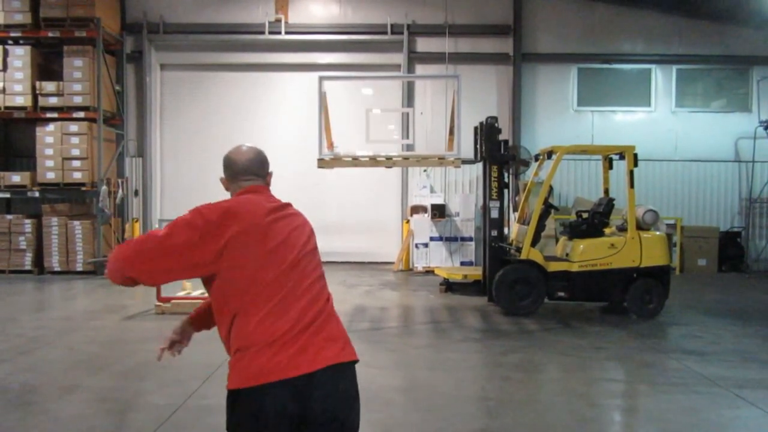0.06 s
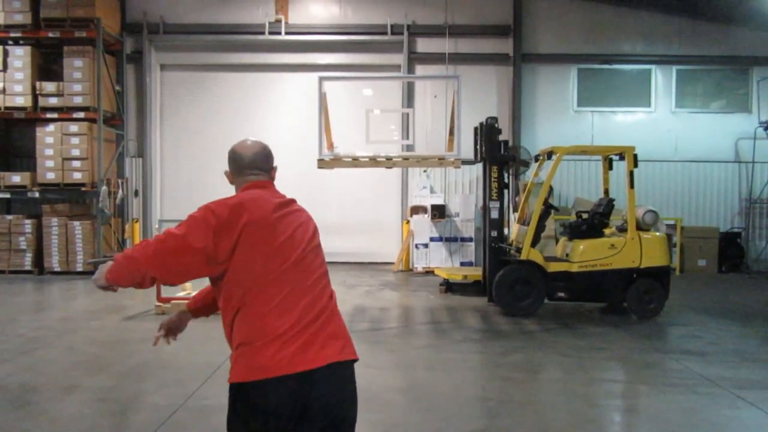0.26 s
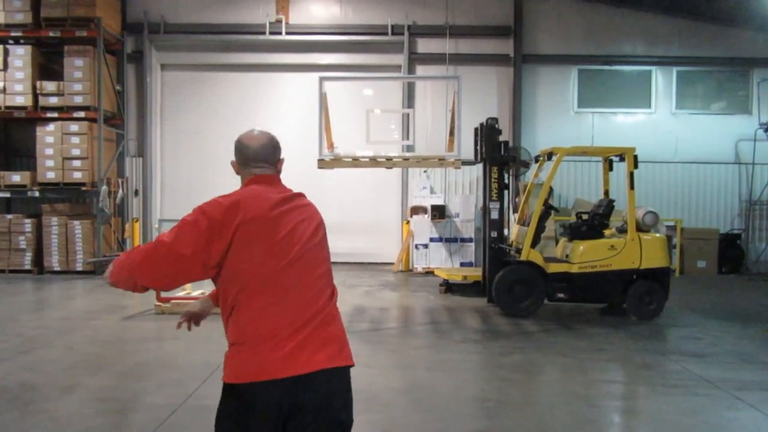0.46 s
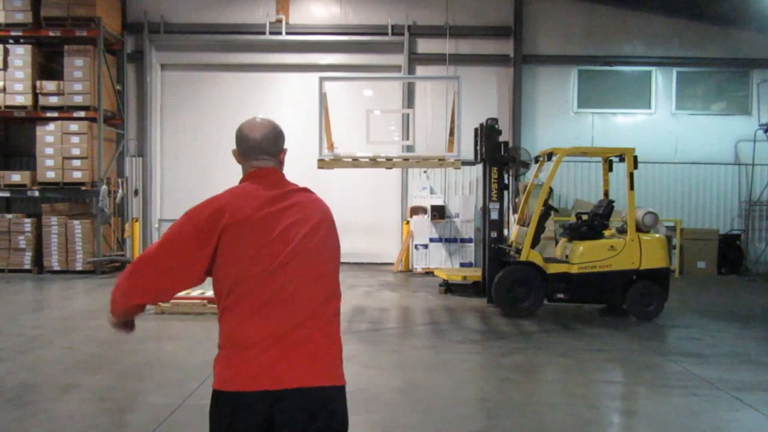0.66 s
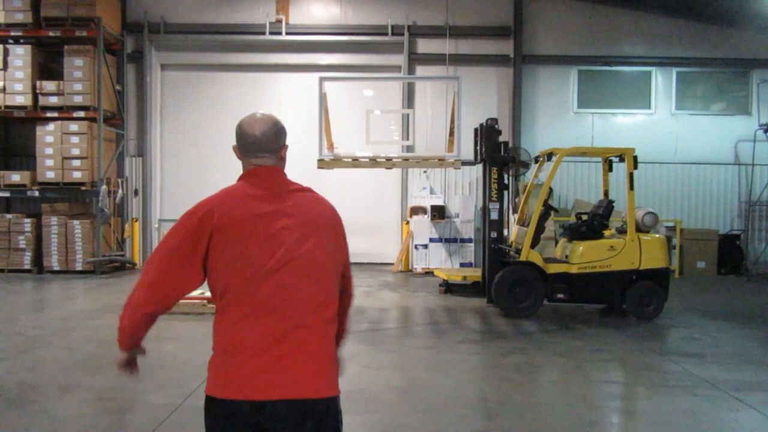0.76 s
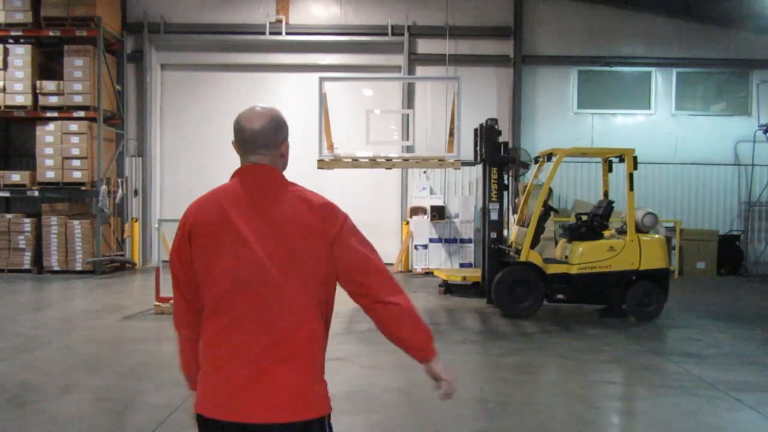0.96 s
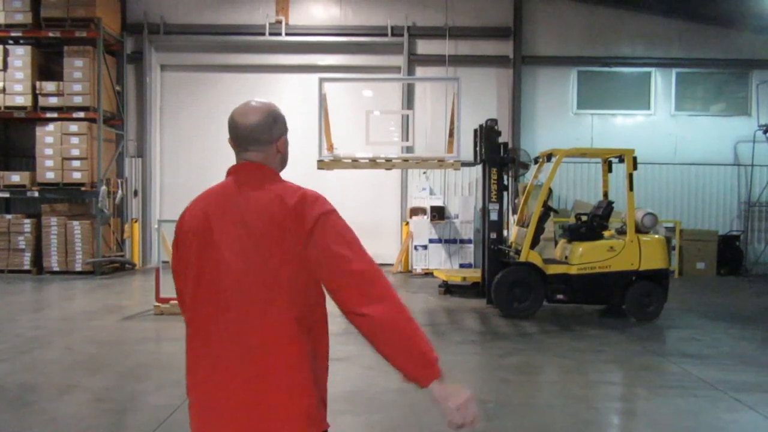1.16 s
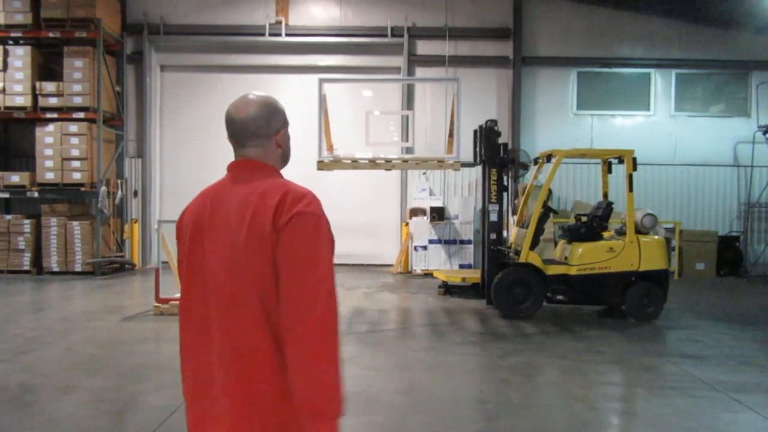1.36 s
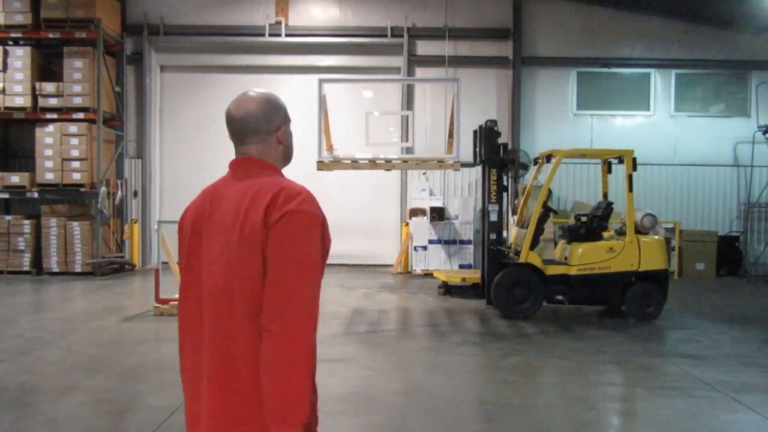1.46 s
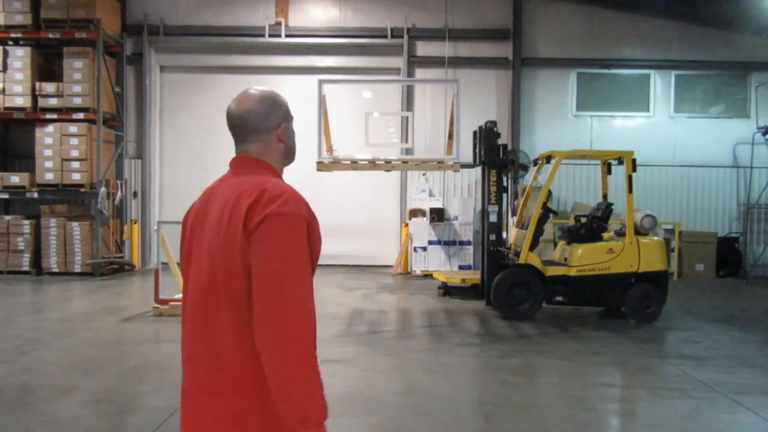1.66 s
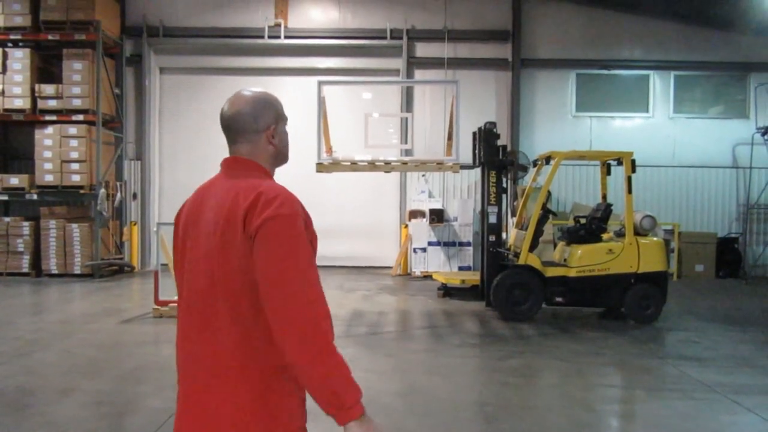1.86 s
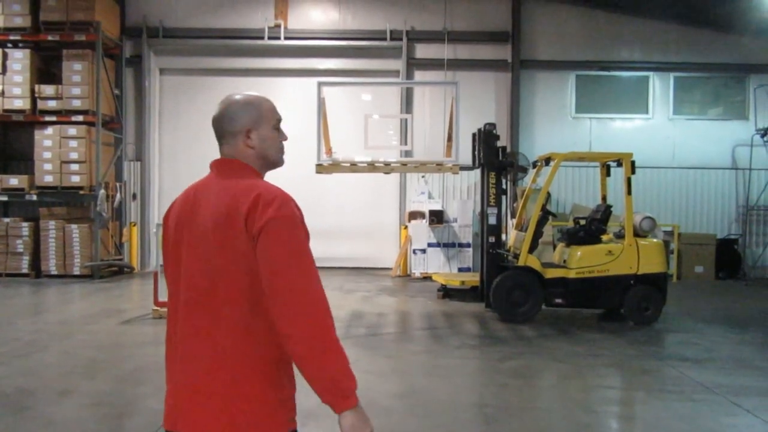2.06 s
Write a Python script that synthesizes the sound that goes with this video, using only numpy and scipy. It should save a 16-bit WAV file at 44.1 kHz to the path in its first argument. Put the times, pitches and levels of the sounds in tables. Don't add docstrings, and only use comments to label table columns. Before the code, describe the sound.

A thrown rock hits a clear plastic backboard with a violent, distorted crack that echoes through a large warehouse; then the rock clicks on the concrete floor a few times, over low fan hum, microphone a few steps away.

```python
import sys
import numpy as np
from scipy import signal
from scipy.io import wavfile

SR = 44100
rng = np.random.default_rng(int(sys.argv[2]) if len(sys.argv) > 2 else 0)


def boost(x):
    u = np.asarray(x, float) / 20
    return 10 ** u


def log_audio(samples):
    frames = np.atleast_2d(samples).T
    limited = np.clip(frames, -1, 1)
    pcm = np.round(limited * 32767).astype(np.int16)
    wavfile.write(sys.argv[1], SR, pcm)


N = 92610

# [f/Hz, level/dB per Hz]
AIR_SPECTRUM = [(15, -35.5), (25, -3), (202, -4.5), (278, -7.5), (488, -8), (1030, -10), (2070, -15.5),
                (6370, -22.5), (15000, -45)]
# [f/Hz, width/Hz, level/dB]
WHINES = [(152.5, 32, -57), (281.4, 20, -59.5), (566, 17, -60), (940, 18, -61.5), (1046, 7.3, -53.5),
          (6260, 31, -60.5), (6300, 250, -61.5)]
# [f/Hz, t60/s]
HALL_DECAY = [(60, .3), (120, .6), (400, 0.95), (1200, 0.93), (2800, 1.053), (5000, .8), (8000, 0.5),
              (14000, .35)]
# [t/s, level/dB, build-up/s]
TAILS = [
    (.2140, 13, 0.009),
    (1.1660, -15.5, 0.0155),
    (1.8110, -17.5, 0.021),
    (2.049, -28, 0.014),
]
# [f/Hz, level/dB per Hz]
CRACK_COLOUR = [(35, -59), (60, -26.5), (438, -19), (539, -23.5), (695, -12.5), (875, -17), (2710, 1.5),
                (6090, -11), (15000, -45.5)]
# [f/Hz, level/dB per Hz]
FIRST_COLOUR = [(410, -42.5), (700, -13), (1180, -18), (1590, -8), (2310, -7.5), (3350, -1), (5310, -5.5),
                (7600, 2), (15000, -41.5)]
# [f/Hz, level/dB per Hz]
SECOND_COLOUR = [(410, -51), (700, -19), (1450, -15.5), (3390, -2.5), (4980, -0.5), (9820, -17.5),
                 (13200, -35.5), (15000, -52)]
# [f/Hz, level/dB per Hz]
THIRD_COLOUR = [(530, -43), (900, -5), (1210, -8), (1410, -26), (2130, -2), (4730, 0), (15000, -42)]
# [t/s, level/dB, f/Hz, length/ms]
CRACK_ECHOES = [(.2236, 23.5, 4600, 1.8), (.2256, 23.5, 4310, 1.2), (.2309, 21, 3500, .8),
                (.2358, 20.5, 3010, 1.8), (.2311, 3, 11000, 0.49), (.2363, 3.5, 9500, .8),
                (.2550, 2.5, 8500, 4.0), (.4280, -8, 2730, 3.7)]
# [t/s, level/dB, f/Hz,
# length/ms]
BOUNCE_ECHOES = [(1.153, -24, 2500, 2.5), (1.1708, -19, 7500, 2.5), (1.1820, -8.5, 3300, 0.95),
                 (1.1822, -20, 7800, 1.2), (1.186, -15, 3500, 1.6), (1.1905, -12, 7000, 1.5),
                 (1.2177, -15.5, 7200, 6.0), (1.795, -28, 3000, 1.5), (1.8117, -17.5, 5200, 1.2),
                 (1.8178, -12, 4500, 1.3), (1.8225, -24, 990, 1.5), (1.8241, -10, 3740, 2.5),
                 (1.8314, -7, 5040, 1), (1.8590, -18, 3770, 9.8), (2.0606, -20, 3960, 1.6),
                 (2.0679, -17, 4960, 1.8), (2.0733, -15.5, 4230, .7), (2.0960, -26, 3040, 2.7)]
# [t/s, level/dB, f/Hz, length/cycles]
BOUNCE_CLICKS = [
    (1.1632, -0.5, 7150, 5.4),
    (1.1629, -4, 2780, 2.8),
    (1.1684, -11, 6000, 2.5),
    (1.8055, -4.5, 5270, 3.1),
    (2.0424, -8.5, 4060, 3.1),
    (2.0505, -9, 4400, 3.1),
]
# [t/s, level/dB]
BLOWS = [
    (.2121, 2.5),
    (0.2126, 4.5),
    (0.2135, 5),
    (0.216, 14),
]
# [f/Hz, level/dB, t60/s]
BOARD_MODES = [(97.9, -28.5, 0.16), (290, -23, 0.045), (600, -23.5, .02), (1050, -12, 0.015),
               (1700, -1, 0.011), (2258, -5, 0.014), (3300, -2.5, .007), (4330, -5, .006),
               (5740, 0.5, 0.0024), (8500, -14, 0.0081), (12900, -20, .004)]


def drift(rate_hz):
    r = np.exp(-2 * np.pi * rate_hz / SR)
    slow = signal.lfilter([1], [1, -2 * r, r * r], rng.standard_normal(N + SR))[SR:]
    return slow / slow.std()


def at_hz(points, hz):
    table_hz, values = np.array(points).T
    return np.interp(np.log(hz), np.log(table_hz), values)


def ring(x, hz, t60_s):
    r = boost(-60 / (t60_s * SR))
    w = 2 * np.pi * hz / SR
    return signal.lfilter([0, np.sin(w)], [1, -2 * r * np.cos(w), r * r], x + 1e-18)


def ring_twice(x, hz, t60_s):
    return ring(ring(x, hz, t60_s), hz, t60_s)


def add(out, t_s, x):
    i = int(t_s * SR)
    out[i:i + len(x)] += x[:len(out) - i]


def banded(spectrum, envelope, size):
    edges = 22 * 2 ** np.arange(0, 9.7, 1 / 3)
    white = rng.standard_normal((2, size))
    out, power = 0, 0
    for k, (low, high) in enumerate(zip(edges, edges[1:])):
        hz = np.sqrt(low * high)
        gain = boost(at_hz(spectrum, hz))
        bandpass = signal.butter(2, [low, high], "band", fs=SR, output="sos")
        out = out + gain * signal.sosfilt(bandpass, white[k % 2]) * envelope(hz)
        power = power + gain ** 2 * (high - low) * 2.2 / SR
    return out / np.sqrt(power)


def ventilation():
    level_db, patchy_db, patchy_hz = -43, 1, 7.6
    air = banded(AIR_SPECTRUM, lambda hz: 1, size=N)
    out = boost(level_db) * air * boost(patchy_db * drift(patchy_hz))
    for hz, width_hz, db in WHINES:
        tone = ring_twice(rng.standard_normal(N + SR), hz, 2.2 / width_hz)[SR:]
        out += boost(db) * tone / tone.std()
    return out


def tails():
    early_db, early_t60_s = 3.5, 0.34
    lumps_db, lumps_hz = 1, 40
    colours = [CRACK_COLOUR, FIRST_COLOUR, SECOND_COLOUR, THIRD_COLOUR]
    lengths = [N, SR, SR // 3, SR // 10]
    out = np.zeros(N)
    for (t_s, db, rise_s), colour, length in zip(TAILS, colours, lengths):
        t = np.arange(length) / SR
        build_up = 1 - np.exp(-t / rise_s)
        early = 1 + boost(early_db - 60 * t / early_t60_s)
        level = boost(db - 7 + lumps_db * drift(lumps_hz)[:length])
        diffuse = banded(colour, lambda hz: boost(-60 * t / at_hz(HALL_DECAY, hz)), size=length)
        add(out, t_s, build_up * early * level * diffuse)
    return out


def echoes(rows):
    relative_width = 0.47
    out = np.zeros(N)
    t = np.arange(2000) / SR
    for t_s, db, hz, ms in rows:
        u = t / (ms * 1e-3)
        noise = ring_twice(rng.standard_normal(len(t)), hz, 2.5 / (relative_width * hz))
        burst = noise * u * np.exp(-2 * u)
        add(out, t_s, boost(db - 0.5) * burst / np.abs(burst).max())
    return out


def bounce_clicks():
    out = np.zeros(N)
    impulse = np.eye(1, 400)[0]
    for t_s, db, hz, cycles in BOUNCE_CLICKS:
        contact = ring_twice(impulse, hz, cycles / hz) * hz / SR * 8
        add(out, t_s, boost(db) * contact)
    return out


def board():
    out = np.zeros(N)
    for hz, mode_db, t60_s in BOARD_MODES:
        blows = np.zeros(N)
        for t_s, blow_db in BLOWS:
            strength_db = blow_db + mode_db + rng.normal(0, 1.5)
            blows[int(t_s * SR)] = boost(strength_db) * rng.choice([-1, 1])
        out += ring(blows, hz, t60_s)
    return out


def scene():
    no_bass = signal.butter(2, 900, "high", fs=SR, output="sos")
    rock = signal.sosfilt(no_bass, bounce_clicks() + echoes(CRACK_ECHOES + BOUNCE_ECHOES))
    return (ventilation() + tails() + rock + board())[None]


def top_cut(x):
    return signal.sosfilt(signal.butter(12, 16740, fs=SR, output="sos"), x)


def record(dry):
    duck_s, attack_s, recover_s = 0.2134, .003, 0.66
    duck_db, stays_db = 15.5, 10
    overload = 0.86
    t = np.maximum(np.arange(N) / SR - duck_s, 0)
    depth_db = stays_db + duck_db * np.exp(-t / recover_s)
    x = dry * boost((np.exp(-t / attack_s) - 1) * depth_db)
    x = x / (1 + np.abs(x / overload) ** 6) ** (1 / 6)
    x = signal.sosfilt(signal.cheby2(10, 40, 15800, fs=SR, output="sos"), x)
    return top_cut(x)


dry = scene()
out = record(dry)
log_audio(out)
```